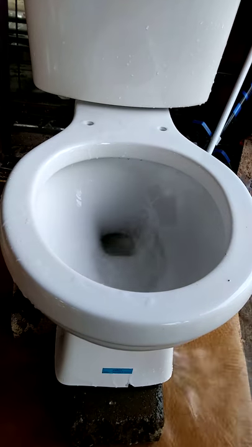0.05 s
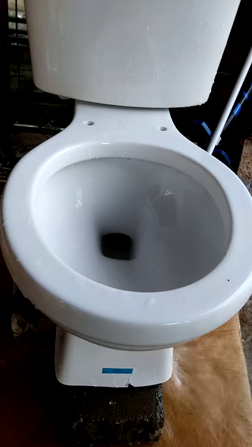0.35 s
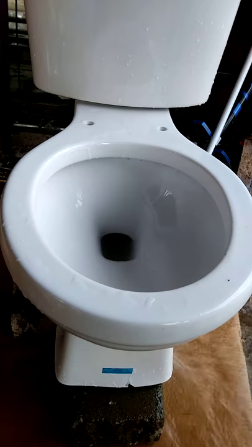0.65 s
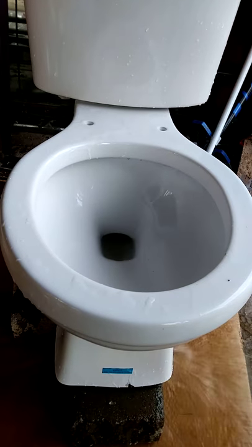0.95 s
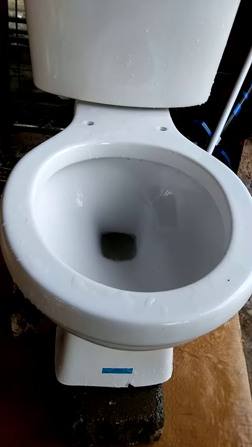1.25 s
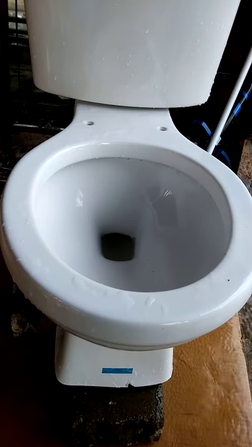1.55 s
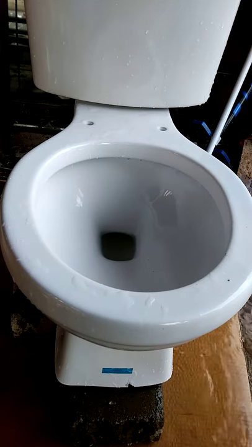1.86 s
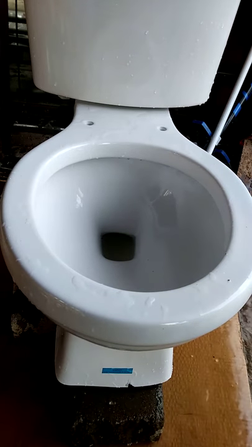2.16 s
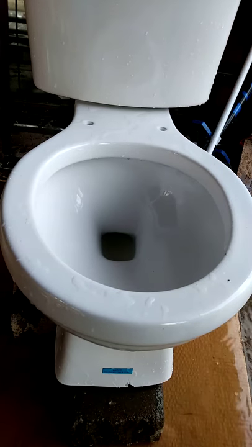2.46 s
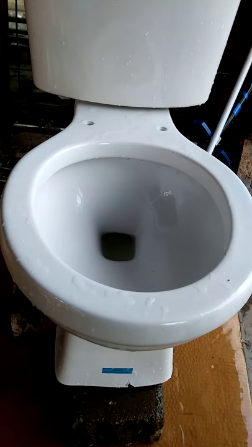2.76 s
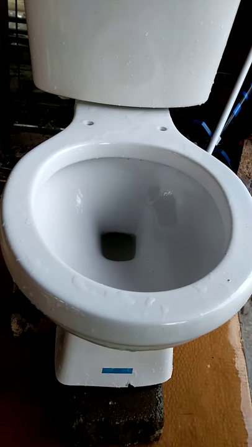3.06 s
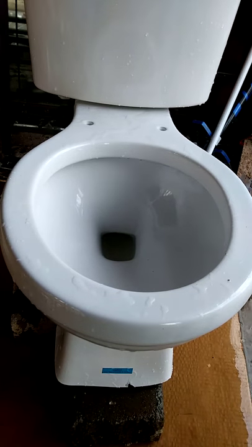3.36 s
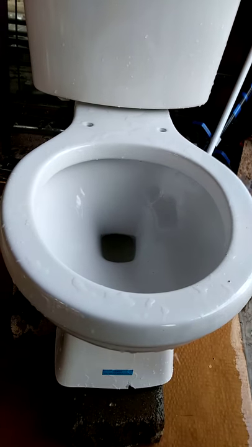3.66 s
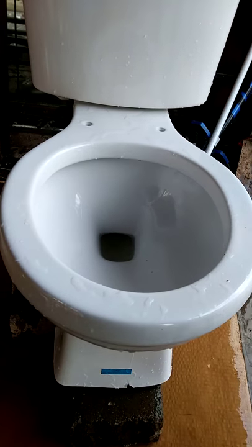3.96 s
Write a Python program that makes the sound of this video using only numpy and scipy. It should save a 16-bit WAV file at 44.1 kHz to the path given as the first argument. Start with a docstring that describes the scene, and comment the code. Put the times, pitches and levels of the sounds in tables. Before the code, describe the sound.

A toilet gulps and gurgles at the end of a flush while water splashes onto the floor. It dwindles to drips and faint outdoor air, then something knocks and briefly rubs close to the microphone.

```python
"""The end of a flush, outdoors

Water gulps air through a toilet's trap, ringing the bowl, and splashes out over the floor.
The flow dies to a trickle and leaves faint open air with a shrill band, like distant insects.
Near the end come a soft scuff, then a knock and a short rub close to the microphone."""
import sys
import numpy as np
from scipy import signal
from scipy.fft import rfft, irfft, next_fast_len
from scipy.io import wavfile
from scipy.ndimage import uniform_filter1d, map_coordinates

SR = 44100
rng = np.random.default_rng(int(sys.argv[2]) if len(sys.argv) > 2 else 0)


def log_audio(samples):
    """Write samples as a 16-bit WAV file to the path given in sys.argv[1]."""
    # one column per channel
    frames = np.atleast_2d(samples).T
    # limit to full scale, then quantise
    limited = np.clip(frames, -1, 1)
    pcm = np.round(limited * 32767).astype(np.int16)
    wavfile.write(sys.argv[1], SR, pcm)


N = 176400

# outflow splashing on the floor (time [s], level [dB])
SPLASH_LEVEL = [(0, -38.5), (.1, -42.5), (.135, -37), (.16, -41), (.29, -43.5), (.33, -46.5), (.41, -44),
                (.45, -41), (.5, -43.5), (.545, -41.5), (.69, -46), (.79, -41.5), (.86, -53), (.95, -45),
                (1.02, -52.5), (1.3, -59), (1.52, -78), (2.4, -98)]
# spurts of water, then in the final row the bright hiss of the scuff (time [s], length [s], level [dB])
HISS_BURSTS = [(1.287, 0.15, -65.5), (1.402, 0.093, -61), (1.623, 0.065, -67), (1.896, 0.042, -66.5),
               (2, 0.041, -68), (2.737, 0.066, -70), (2.82, 0.18, -66.5), (3.298, 0.11, -64)]
# bright hiss of the spurts, the scuff and the rub (frequency [Hz], gain [dB])
HISS_SPECTRUM = [(100, -37), (1500, -14), (3500, -6), (5000, 0), (6500, -0.5), (9000, -15), (15500, -16.5)]


def gulps(attack_s=0.0013, rise=0.11, roughness=0.33, spray_db=-24, spray_peak_s=0.0083):
    """Each air pocket breaks in, rings unsteadily at a rising pitch, is choked off and throws spray."""
    # air pockets in the trap (time [s], level [dB], pitch [Hz], length [s])
    pockets = [(.040, -16.5, 666, 0.021), (0.0407, -23.5, 376, 0.019), (.122, -14.5, 776, 0.018),
               (0.125, -25.5, 1252, 0.022), (0.131, -22.5, 710, 0.015), (.18, -21.5, 750, 0.01),
               (0.226, -23, 895, .015), (.232, -31, 1280, 0.027), (0.241, -32.5, 1052, 0.037),
               (0.29, -31.5, 618, 0.027), (.344, -34.5, 302, 0.051), (.369, -28, 630, 0.019),
               (0.426, -19, 1008, 0.042), (.427, -15.5, 674, 0.028), (0.434, -13, 820, 0.025),
               (.447, -13.5, 1000, 0.026), (.449, -11.5, 725, 0.025), (.5135, -14, 916, 0.019),
               (.514, -17, 670, 0.016), (.516, -23, 285, 0.031), (.536, -19, 890, .018),
               (.537, -29, 1602, 0.044), (0.546, -18.5, 820, .02), (0.557, -33, 340, .03),
               (0.566, -16, 656, .023), (0.576, -15, 929, 0.032), (.661, -20.5, 680, 0.019),
               (.662, -32, 287, 0.017), (0.681, -35, 1030, 0.028), (0.719, -27.5, 683, 0.019),
               (0.743, -38, 292, 0.034), (.78, -35.5, 190, 0.038), (0.887, -35, 1040, 0.025),
               (.939, -35, 546, 0.062), (1, -47, 197, 0.12), (1.024, -36, 539, 0.049)]
    # spray thrown by a gulp (frequency [Hz], gain [dB])
    spray_spectrum = [(100, -38.5), (700, -10), (1350, 5.5), (1600, -9), (2050, 5.5), (2500, -5),
                      (4000, -10), (7000, -5.5), (15000, -40.5)]
    tones, spray_power, t = np.zeros(N), np.zeros(N), np.arange(SR // 8) / SR
    spray_shape = t / spray_peak_s * np.exp(1 - t / spray_peak_s)
    for start, db, hz, length in pockets:
        age = np.minimum(t / length, 2)
        drift = roughness * np.cumsum(rng.standard_normal(len(t))) * np.sqrt(hz / SR)
        phase = 2 * np.pi * hz * t * (1 + rise * age / 2) + uniform_filter1d(drift, size=24)
        add(tones, start, amp(db - 60 * age ** 2) * np.sin(phase) * (1 - np.exp(-t / attack_s)))
        add(spray_power, start, (amp(db + spray_db) * spray_shape) ** 2)
    return tones + np.sqrt(spray_power) * noise(spray_spectrum)


def slurp(start=0.745, length=0.072, from_hz=900, to_hz=1380, t60=0.036, count=44):
    """The siphon breaks: a quick run of ever smaller bubbles."""
    out = np.zeros(N)
    for k, (late, detune, louder) in enumerate(rng.uniform(-0.99, 1, (count, 3))):
        progress = (k + late) / count
        hz = (from_hz + (to_hz - from_hz) * progress) * np.exp(0.208 * detune)
        db = -31 + 2 * louder + 2.6 * (progress - 0.5)
        add(out, start + length * progress, amp(db) * bubble(hz, t60))
    return out


def churn():
    """Small bubbles and turbulence tumble through the trap."""
    # strength of the churning (time [s], level [dB])
    flow = [(0, -37), (.2, -40.5), (.3, -40.5), (.41, -39.5), (.46, -37.5), (.505, -39), (.56, -29),
            (.64, -38.5), (.77, -37), (.85, -46.5), (.94, -39), (1.0, -50.5), (1.1, -57), (1.3, -64.5),
            (1.5, -84), (1.8, -84)]
    # churning water (frequency [Hz], gain [dB])
    spectrum = [(30, -56.5), (100, -42), (180, -14.5), (280, -5.5), (480, -5), (680, -0.5), (1050, 4),
                (1450, -6), (2050, -3), (2500, -8), (4000, -21), (9000, -71.5)]
    cloud = bubbles(900, hz=777.7, spread=0.453, cycles=20, scatter_db=3.5, rise=0.25, samples=1200)
    water = unit(colour(cloud + amp(1) * rng.standard_normal(N), spectrum))
    return water * level(flow) * amp(1.2 * wobble(45))


def bowl(water, detune=0.026):
    """The hollow of the bowl rings along with the water; sloshing keeps shifting its resonances."""
    # air resonances of the bowl (frequency [Hz], gain [dB], t60 [s])
    modes = [(290, -4, 0.12), (384, -5.5, 0.12), (644, -8, 0.073), (719.5, -7, 0.11), (857, -5.5, 0.067),
             (987, -3, 0.15), (1057, -5, 0.15), (1324, 2, 0.082), (1642, 4, 0.13), (1790, -8.5, 0.14),
             (1976, 7.5, 0.13), (2200, -12, 0.14)]
    ring = np.zeros(N)
    for hz, db, t60 in modes:
        drifting_hz = hz * (1 + detune * wobble(14))
        carrier = np.exp(2j * np.pi * np.cumsum(drifting_hz) / SR)
        pole = amp(-60 / (t60 * SR))
        # shift down, smooth, shift back: a resonance that follows the drifting pitch
        ring += 2 * amp(db) * (carrier * signal.lfilter([1 - pole], [1, -pole], water / carrier)).real
    return amp(-1.5) * water + amp(4.5) * ring


def splash(grain):
    """Outflow hits the floor as a fizz of droplets, then in a few last spurts."""
    # water hitting the floor (frequency [Hz], gain [dB])
    spectrum = [(100, -32), (600, -10), (1900, 2.5), (2500, -2.5), (3400, -6), (4100, -3), (5000, -4.5),
                (6200, -1.5), (7500, -9.5), (9000, -18.5), (12000, -22.5), (15500, -31.5)]
    outflow = unit(colour(grain, spectrum)) * level(SPLASH_LEVEL) * amp(1.73 * wobble(70.1))
    spurts = sum(amp(db) * swell(start, length / 2, 0, length / 2)
                 for start, length, db in HISS_BURSTS[:-1])
    return outflow + unit(colour(grain, HISS_SPECTRUM)) * spurts


def swishes():
    """Each sheet or drop of water slapping the floor bursts into a swarm of like-sized tiny bubbles."""
    # swarms (time [s], length [s], level [dB], pitch [Hz], pitch spread [log ratio])
    swarms = [(0.111, 0.046, -38, 4140, 0.1), (0.157, 0.076, -44, 4340, 0.065),
              (0.284, 0.098, -46, 4200, 0.072), (.74, 0.1, -47.5, 5900, 0.056),
              (1.358, 0.038, -59, 6600, 0.048), (1.618, 0.026, -63, 8200, 0.47),
              (1.721, 0.034, -73.5, 10000, .07)]
    out = np.zeros(N)
    for start, length, db, hz, spread in swarms:
        swarm = bubbles(1000, hz, spread, cycles=53, scatter_db=-0.5, rise=0, samples=400)
        out += amp(db) * swell(start, length / 2, 0, length / 2) * swarm
    return out


def crackle():
    """The finest droplets of the splash fizz softly."""
    fizz = bubbles(1600, hz=9120, spread=0.27, cycles=13.46, scatter_db=6, rise=0, samples=120)
    return amp(-22) * level(SPLASH_LEVEL) * fizz


def drips(t60=0.013):
    """Single drops tick on the wet floor."""
    # drops (time [s], peak level [dB])
    drops = [(1.182, -45.5), (1.231, -38), (3.797, -55)]
    # tick of a drop (frequency [Hz], gain [dB])
    spectrum = [(2000, -23), (5000, 6), (8000, 0), (16000, -17)]
    out, t = np.zeros(N), np.arange(SR // 30) / SR
    for start, db in drops:
        tick = colour(rng.standard_normal(len(t)) * amp(-60 * t / t60), spectrum)
        add(out, start, amp(db) * tick / np.abs(tick).max())
    return out


def drain():
    """The emptied trap hums in fits, on nearly steady pitches, as the last water runs through."""
    # tones of the trap (frequency [Hz], relative level [dB])
    tones = [(567, 2.5), (403, -9), (803, -5)]
    # fits of humming (time [s], level [dB])
    fits = [(.8, -79), (.94, -52), (1.09, -59.5), (1.17, -48), (1.23, -65), (1.29, -61), (1.4, -73),
            (1.56, -83.5), (1.61, -65), (1.75, -83)]
    hum = sum(amp(db + 2.8 * wobble(20)) * np.sin(2 * np.pi * hz * clock() + wobble(30))
              for hz, db in tones)
    return unit(hum) * level(fits)


def gurgles(t60=0.032, spread=0.188, count=10):
    """Faint clusters of bubbles ring in the pipe as the last water settles."""
    # clusters (time [s], length [s], level per bubble [dB], pitch [Hz])
    clusters = [(1.152, 0.055, -51, 1780), (1.266, 0.057, -51.5, 1835), (2.333, .04, -57.5, 685),
                (2.77, 0.046, -62.5, 1920)]
    out = np.zeros(N)
    for start, length, db, hz in clusters:
        for when, detune in zip(rng.random(count), rng.standard_normal(count)):
            add(out, start + length * when, amp(db) * bubble(hz * np.exp(spread * detune), t60))
    return out


def puffs():
    """Two deep gulps each give the air at the microphone one slow push and pull."""
    # puffs of air (time [s], level [dB], length [s])
    pushes = [(0.423, -59.5, 0.016), (0.522, -57, 0.018)]
    out = np.zeros(N)
    for start, db, length in pushes:
        progress = np.clip((clock() - start) / length, 0, 1)
        out += amp(db) * np.sin(2 * np.pi * progress) * np.sin(np.pi * progress)
    return out


def knock():
    """Something bumps close to the microphone: each contact thumps a hollow body and clicks."""
    # ring of the body (frequency [Hz], relative level [dB], t60 [s])
    modes = [(267, -1.5, 0.036), (456, 1.5, 0.022), (588, -1.5, 0.044), (848, -0.5, 0.029),
             (980, -9, 0.016), (1470, -9, .018), (2130, -6, 0.022)]
    # contacts within the knock (time [s], thump peak [dB], click peak [dB])
    contacts = [(3.6355, -13.5, -33), (3.6391, -34, -24.5), (3.6398, -26, -22.5), (3.6417, -18.5, -11.5)]
    # tone of the thump and of the click (frequency [Hz], gain [dB])
    thump_spectrum = [(25, -31), (90, -27.5), (260, 4.5), (1000, 1.5), (2200, -2.5), (3500, -21.5)]
    click_spectrum = [(60, -32), (900, 11.5), (2200, -2.5), (3000, 4.5), (4200, 0.5), (6200, 3.5),
                      (7800, -14), (16000, -25)]
    out, t = np.zeros(N), np.arange(SR // 8) / SR
    ring = sum(amp(db - 60 * t / t60) * np.sin(2 * np.pi * hz * t) for hz, db, t60 in modes)
    thump = colour(ring, thump_spectrum)
    click_decay = amp(-60 * t / 0.0026) + amp(-24 - 60 * t / 0.03)
    for start, thump_db, click_db in contacts:
        click = colour(rng.standard_normal(len(t)) * click_decay, click_spectrum)
        add(out, start, amp(thump_db) * thump / np.abs(thump).max())
        add(out, start, amp(click_db) * click / np.abs(click).max())
    return out


def rub(from_hz=280, to_hz=750, roughness=1.4):
    """A short, rough rub at the microphone rises in pitch as it speeds up and ends in a hiss."""
    # friction noise (frequency [Hz], gain [dB])
    spectrum = [(47, -65), (80, -41), (216, -11.5), (374, -10), (446, -5), (607, 4), (1710, -16),
                (2970, -10), (3390, -20.5), (6560, -18), (15500, -41)]
    stroke = swell(3.657, 0.025, 0.066, 0.033)
    hz = np.interp(clock(), [3.67, 3.76], [from_hz, to_hz])
    scrape = amp(-52) * np.sin(2 * np.pi * np.cumsum(hz) / SR + roughness * wobble(200))
    friction = (amp(-47.5) * noise(spectrum) + scrape) * amp(1.9 * wobble(400))
    hiss = amp(-52.5) * swell(3.7, 0.045, 0, 0.042) * noise(HISS_SPECTRUM)
    return stroke * friction + hiss


def scuff():
    """One soft brush of noise ahead of the knock."""
    # dull scuff (frequency [Hz], gain [dB])
    spectrum = [(60, -45), (300, -1), (900, 4.5), (1500, 8.5), (1900, -5), (5000, -14), (9000, -27),
                (15000, -47)]
    return amp(-53.5) * swell(3.298, 0.002, 0.02, 0.05) * noise(spectrum)


def scuff_hiss(grain):
    """The bright hiss of the scuff swells and fades."""
    start, length, db = HISS_BURSTS[-1]
    return amp(db) * swell(start, length / 2, 0, length / 2) * unit(colour(grain, HISS_SPECTRUM))


def walls(x, t60, wet_db):
    """Nearby walls scatter a short tail back to the microphone."""
    t = np.arange(SR // 3) / SR
    tail = rng.standard_normal(len(t)) * amp(-60 * t / t60) * (1 - np.exp(-t / 0.0036))
    return x + amp(wet_db) * signal.fftconvolve(x, tail / np.linalg.norm(tail))[:N]


def background():
    """A distant outdoor rush, a shrill chorus and one brief, thin whistle."""
    # open air and the insect-like band (frequency [Hz], gain [dB])
    air_spectrum = [(25, -33.5), (90, -21.5), (200, -10), (500, -5.5), (950, 2), (1300, -6), (2100, -10.5),
                    (3700, -14.5), (6500, -16), (9000, -20), (15500, -22)]
    chorus_spectrum = [(1800, -40.5), (2550, -18.5), (2850, -5.5), (3020, -3), (3220, -8), (3500, -30.5),
                       (4200, -68)]
    whistle_gain = amp(-70 + 3 * wobble(45)) * swell(3.42, 0.012, 0.03, 0.1)
    whistle = whistle_gain * np.sin(2 * np.pi * 6860 * clock() + 0.6 * wobble(120))
    air = amp(-64.5) * noise(air_spectrum) * amp(0.496 * wobble(13))
    chorus = amp(-65.5) * noise(chorus_spectrum) * amp(1.05 * wobble(25.4))
    return air + chorus + whistle


def bubble(hz, t60):
    """One bubble rings up within a few cycles and dies away."""
    t = np.arange(SR // 20) / SR
    return amp(-60 * t / t60) * np.sin(2 * np.pi * hz * t) * (1 - np.exp(-t * hz))


def bubbles(per_s, hz, spread, cycles, scatter_db, rise, samples):
    """A steady cloud of damped tones, rms 1; each falls 60 dB in `cycles` while gliding up by `rise`."""
    draws = rng.random((24000, 4))[:int(per_s * N / SR)]
    when, radius, angle, strength = np.clip(draws, 1e-6, 1).T[..., None]
    detune = np.sqrt(-2 * np.log(radius)) * np.cos(2 * np.pi * angle)  # Gaussian
    pitch = np.clip(hz * np.exp(spread * detune), 150, 15000)
    turns = pitch * np.arange(samples) / SR
    age = np.minimum(turns / cycles, 2)
    envelope = amp(-60 * age) * (1 - np.exp(-2 * turns))
    tones = envelope * np.sin(2 * np.pi * turns * (1 + rise * age / 2))
    gains = amp(scatter_db * np.minimum(-np.log(strength), np.pi))
    positions = (when * N).astype(int) + np.arange(samples)
    return unit(np.bincount(positions.ravel(), (tones * gains).ravel(), N)[:N])


def grainy_noise(depth_db=2.0):
    """Tiny pings in white noise; patches of the spectrum swell and sink at random."""
    pings = bubbles(1500, hz=4205, spread=0.555, cycles=78, scatter_db=-0.5, rise=0.081, samples=600)
    frames = signal.stft(pings + amp(7.5) * rng.standard_normal(N), nperseg=512)[2]
    bands = uniform_filter1d(rng.standard_normal(frames.shape), size=7, axis=0)
    patches = unit(uniform_filter1d(bands, size=9, axis=1))
    return signal.istft(frames * amp(depth_db * patches), nperseg=512)[1][:N]


def colour(x, points):
    """Minimum-phase filter through (frequency [Hz], gain [dB]) points."""
    size = 2 * next_fast_len(len(x) // 2 + 4096)
    hz, db = np.transpose(points)
    gain = amp(np.interp(np.log(np.fft.rfftfreq(size, 1 / SR) + 1), np.log(hz), db))
    cepstrum = irfft(np.log(gain))
    cepstrum[1:size // 2] *= 2
    cepstrum[size // 2 + 1:] = 0
    return irfft(rfft(x, size) * np.exp(rfft(cepstrum)))[:len(x)]


def noise(points):
    """Coloured noise of rms 1."""
    return unit(colour(rng.standard_normal(N), points))


def wobble(rate):
    """A smooth random curve, `rate` knots a second."""
    return map_coordinates(rng.standard_normal(2048), [clock() * rate], mode="wrap")


def swell(start, attack, hold, release):
    """A straight attack, hold, release envelope, timed in seconds."""
    return np.interp(clock(), start + np.cumsum([0, attack, hold, release]), [0, 1, 1, 0])


def level(points):
    """Gain per sample from (time [s], level [dB]) points."""
    return amp(np.interp(clock(), *np.transpose(points)))


def add(track, start, x):
    """Mix x into the track at `start` seconds."""
    part = track[round(start * SR):][:len(x)]
    part += x[:len(part)]


def amp(db):
    """Decibels to gain."""
    return 10 ** (np.asarray(db) / 20)


def unit(x):
    """Scale to rms 1."""
    return x / np.sqrt(np.mean(x ** 2) + 1e-20)


def clock():
    """The time of each sample."""
    return np.arange(N) / SR


def scene():
    """One microphone hears the water among nearby walls, small sounds up close and the distance beyond."""
    # tone of the air breaking through the trap (frequency [Hz], gain [dB])
    gulp_spectrum = [(25, -61), (100, -37), (170, -19), (260, 1.5), (2000, -2), (8000, -7)]
    trap = churn() + colour(gulps() + slurp(), gulp_spectrum)
    toilet = bowl(trap) + drain() + gurgles()
    grain = grainy_noise()
    floor = splash(grain) + drips() + swishes() + crackle()
    nearby = walls(toilet + floor + scuff_hiss(grain), t60=0.16, wet_db=-11.5)
    close = puffs() + rub() + scuff() + knock()
    return (nearby + close + background())[None]


def record(dry):
    """The recorder keeps nothing above its band limit."""
    top_hz = 15800
    size = next_fast_len(N + SR // 2)
    passband = np.fft.rfftfreq(size, 1 / SR) < top_hz
    return irfft(rfft(dry, size) * passband, size)[..., :N]


dry = scene()
out = record(dry)
log_audio(out)
```